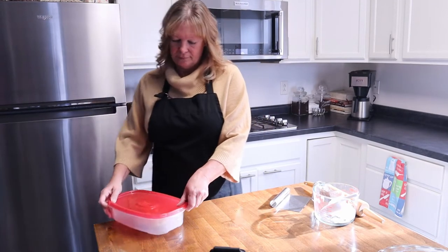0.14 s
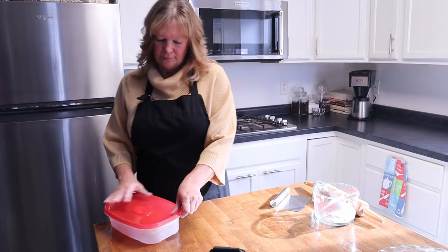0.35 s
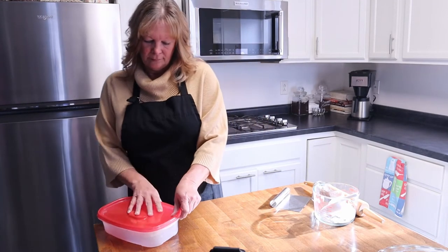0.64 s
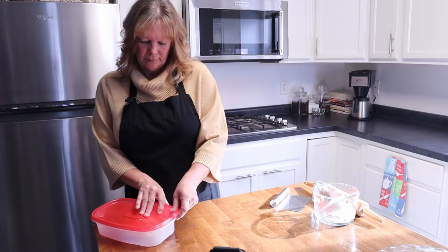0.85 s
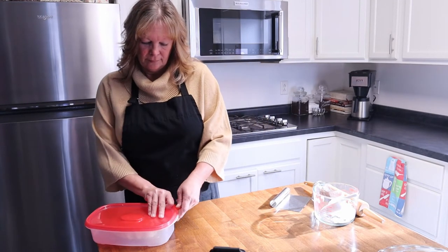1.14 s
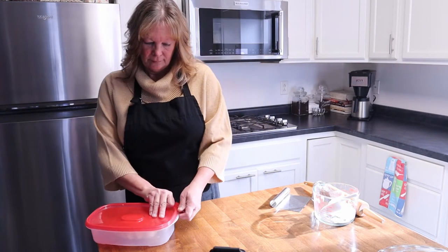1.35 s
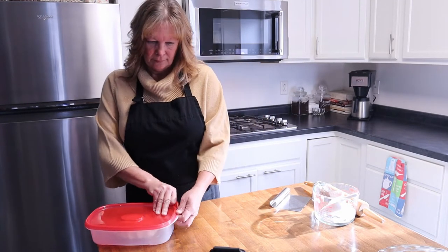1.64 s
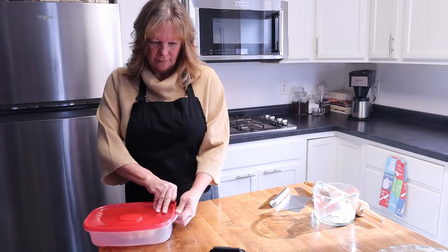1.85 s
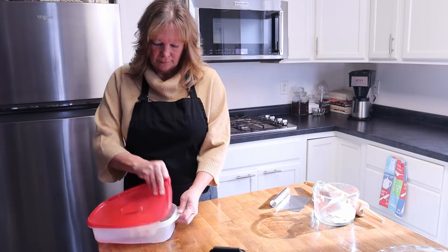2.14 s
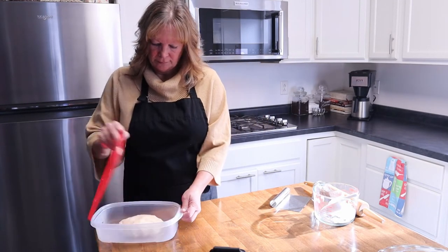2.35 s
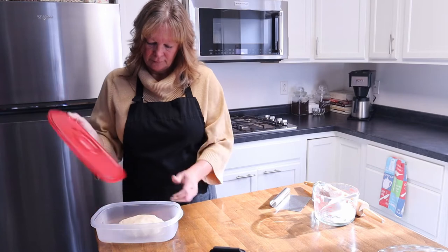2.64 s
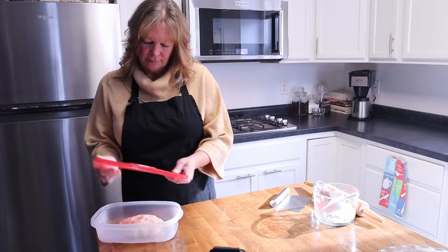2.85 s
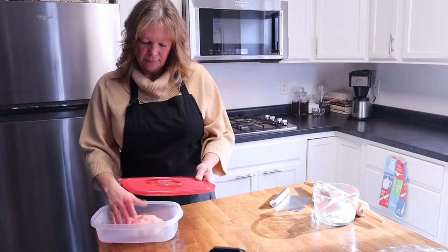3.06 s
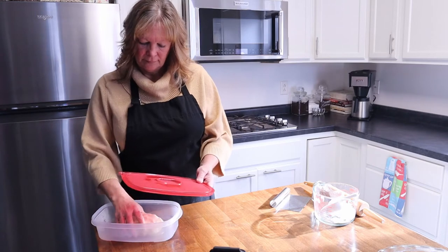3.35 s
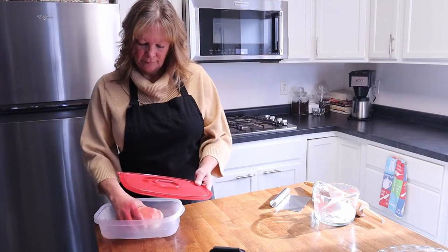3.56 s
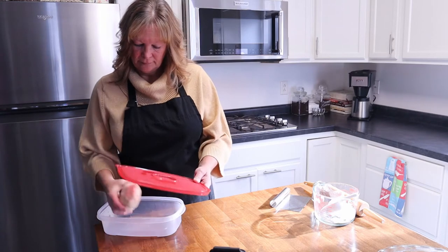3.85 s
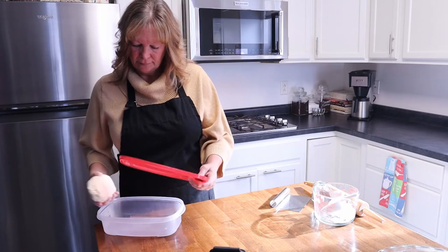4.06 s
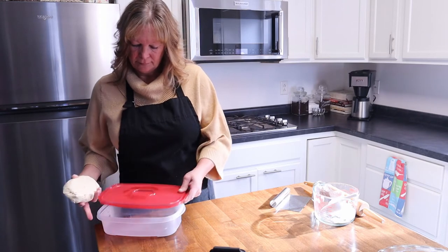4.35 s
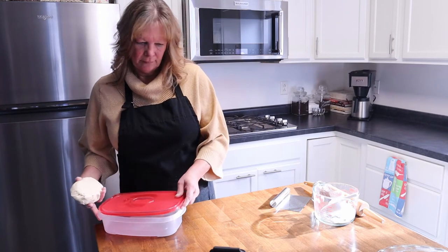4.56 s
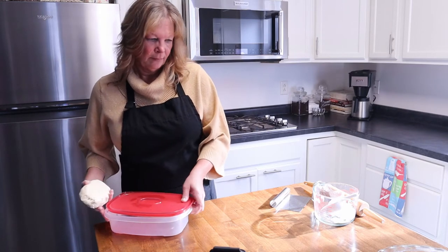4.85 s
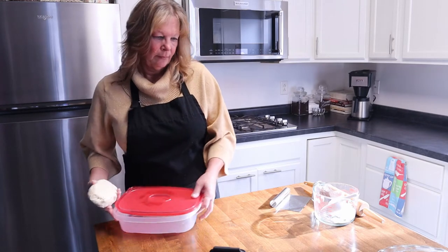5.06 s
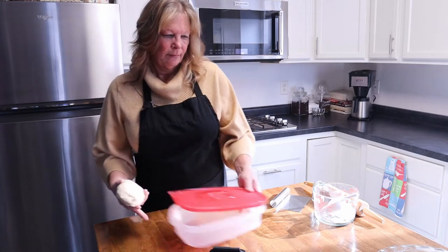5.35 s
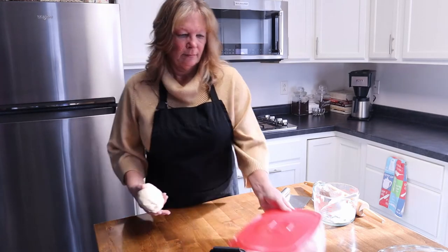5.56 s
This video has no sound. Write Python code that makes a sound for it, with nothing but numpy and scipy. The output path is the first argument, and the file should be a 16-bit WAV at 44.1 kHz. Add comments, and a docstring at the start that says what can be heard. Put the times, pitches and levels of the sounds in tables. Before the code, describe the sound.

A plastic tub thumps and scrapes onto a wooden counter, its lid clicks and pops off, then snaps sharply back on over a fridge hum.

```python
"""Plastic tub and snap lid on a kitchen counter

A plastic tub is set on a wooden counter, its snap lid is pressed, peeled off and dropped back on.
Knocks ring decaying modes of tub and lid; the rim cracks in filtered clicks; skin and sliding tub
are dense stick-slip clicks; the counter top adds low plate modes and rumble. A small hard kitchen
echoes the near sounds by noise convolution, over the shaped noise and tones of a refrigerator."""
import sys
import numpy as np
from scipy import signal
from scipy.fft import rfft, irfft, next_fast_len
from scipy.io import wavfile

SR = 44100
rng = np.random.default_rng(int(sys.argv[2]) if len(sys.argv) > 2 else 0)


def waveform_to_disk(signal):
    """Save audio, clipped to [-1, 1], as 16-bit WAV at the path in sys.argv[1]."""
    frames = np.transpose(np.atleast_2d(signal))
    scaled = np.clip(frames, -1, 1) * 32767
    samples = np.round(scaled).astype(np.int16)
    wavfile.write(sys.argv[1], SR, samples)


N = 251105

# modes of tub and lid: mode_hz, relative_db
TUB_MODES = [(75, -40.5), (140, -7), (190, -2.5), (254, -0.5), (320, -9), (345, -4), (415, -3.5), (460, -1),
             (515, -0.5), (590, 7), (665, 0), (720, -1.5), (825, 2.5), (905, -8.5), (993, -2.5), (1115, -5),
             (1230, 0), (1333, 5.5), (1440, 2.5), (1595, 9.5), (1775, 4), (1987, 5.5), (2445, 2), (2840, 7)]


def from_db(db):
    """Gain of a level in dB."""
    return 10 ** (np.asarray(db) / 20)


def rms_one(x):
    """Scales to rms 1."""
    return x / np.sqrt(np.mean(x ** 2) + 1e-20)


def at_hz(points, hz):
    """Interpolates a (Hz, value) table along log frequency."""
    table_hz, values = np.transpose(points)
    return np.interp(np.log(hz + 1), np.log(table_hz), values)


def coloured(x, spectrum):
    """Filters a signal by a spectrum in dB, at zero phase."""
    size = next_fast_len(len(x))
    gain = from_db(at_hz(spectrum, np.fft.rfftfreq(size, 1 / SR)))
    return irfft(rfft(x, size) * gain, size)[:len(x)]


def drift(rate_hz):
    """Slow random wander of rms 1: noise through a double one-pole lowpass."""
    r = np.exp(-2 * np.pi * rate_hz / SR)
    wander = signal.lfilter([1], [1, -2 * r, r * r], rng.standard_normal(N + SR))
    return rms_one(wander[SR:])     # drops the settling second


def add(out, start_s, sound):
    """Mixes a short sound in at a time."""
    at = round(start_s * SR)
    out[at:at + len(sound)] += sound[:max(N - at, 0)]


def near_to(hz, centre_hz, octaves):
    """Bell-shaped weight of a mode by its distance in pitch."""
    return np.exp(-.5 * (np.log2(hz / centre_hz) / octaves) ** 2)


def swells(peak_s, level_db, swell_s, fade_s):
    """Power of each gesture, every 32nd sample: climbs 20 dB in its swell, sinks 20 dB in its fade."""
    late_s = np.arange(0, N, 32) / SR - np.c_[peak_s]
    before = -late_s / np.c_[np.maximum(swell_s, .001)]
    after = late_s / np.c_[fade_s]
    return from_db(np.c_[level_db] - 20 * np.maximum(before, after)) ** 2


def smooth(power):
    """Gain at every sample from power at every 32nd."""
    return np.interp(np.arange(N) / 32, np.arange(len(power)), np.sqrt(power))


def friction(spectrum, slips_per_s, spread_db, patchy_db, patch_hz):
    """Stick and slip: dense clicks of uneven size and random sign whose level wanders in patches."""
    sizes = from_db(spread_db * np.minimum(rng.exponential(1, N), 5)) * rng.choice([-1, 1], N)
    happens = rng.random(N) < slips_per_s / SR
    slips = sizes * happens * from_db(patchy_db * drift(patch_hz))
    return rms_one(coloured(slips, spectrum))


def refrigerator(waver_db):
    """Fan and room noise of a fixed spectrum, with compressor tones that waver in level and phase."""
    # fan and room noise: freq_hz, relative_db_per_hz
    drone_spectrum = [(15, -43), (25, -5), (48, -30), (116, -7.5), (210, -5.5), (369, -1), (552, 1),
                      (667, 3), (921, -10), (1210, -16), (1310, -45), (1620, -58), (2360, -19), (8370, -23),
                      (15600, -25)]
    # compressor tones: pitch_hz, median_rms_db
    hum_tones = [(118.4, -58), (236.9, -62), (323.0, -55.5), (366.1, -57.5), (436.0, -55.5), (1184, -65.5)]
    t = np.arange(N) / SR
    tones = np.zeros(N)
    for hz, db in hum_tones:
        gain = np.sqrt(2) * from_db(db + waver_db * drift(1.3))
        tones += gain * np.sin(2 * np.pi * hz * t + 0.68 * drift(2.4))
    drone_db = -50.5
    return from_db(drone_db) * rms_one(coloured(rng.standard_normal(N), drone_spectrum)) + tones


def kitchen(x):
    """Room echo: octave bands of noise, each dying at its own rate after the first wall."""
    # reverberation: freq_hz, t60_s
    room_t60 = [(100, 0.29), (400, 0.24), (1500, 0.31), (5000, 0.28), (12000, 0.34)]
    echo_db, first_wall_s = -7, 0.0042
    t = np.arange(SR // 2) / SR
    # early echoes stand apart
    uneven_db = 3.2 * rng.standard_normal(len(t)) * np.exp(-t / 0.015)
    white = rng.standard_normal(len(t)) * from_db(uneven_db)
    tail = np.zeros(len(t))
    for low_hz in 40 * 2. ** np.arange(9):
        edges_hz = [low_hz, min(2 * low_hz, .45 * SR)]
        band = signal.sosfilt(signal.butter(2, edges_hz, "band", fs=SR, output="sos"), white)
        tail += band * from_db(-60 * t / at_hz(room_t60, np.sqrt(2) * low_hz))
    tail *= np.clip(t / first_wall_s - 1, 0, 1)     # silent to the first wall, full at twice that
    return from_db(echo_db) * signal.fftconvolve(x, tail / np.linalg.norm(tail))[:N]


def rumble():
    """The counter top shakes when hit or leaned on: lumpy low noise under each shake."""
    # shakes of the counter: peak_s, level_db, swell_s
    shakes = [(0.0, -42, 0.061), (0.16, -18.5, 0.055), (0.33, -35, .2), (0.5, -44, .2), (0.7, -44, 0.16),
              (0.86, -39, .15), (1.09, -36, 0.099), (1.8, -53, .15), (1.98, -54, .2), (2.28, -52, 0.13),
              (2.84, -51.5, 0.17), (3.2, -44, 0.18), (3.6, -52, .1), (4.57, -48, 0.052), (4.79, -53, 0.087),
              (4.99, -54, .1), (5.69, -44, .03)]
    # counter noise: freq_hz, relative_db_per_hz
    rumble_spectrum = [(12, -32), (20, -2), (32, -1), (70, 1), (97, -1), (110, -2), (140, -44), (240, -120)]
    fade_per_swell, still_db = 1.4, -60
    peak_s, level_db, swell_s = np.transpose(shakes)
    power = swells(peak_s, level_db, swell_s, fade_per_swell * swell_s).sum(axis=0) + from_db(still_db) ** 2
    noise = friction(rumble_spectrum, 1300.0, spread_db=6.5, patchy_db=4.5, patch_hz=31.0)
    return smooth(power) * noise


def thuds(contact_s):
    """The counter top answers a blow with a few low plate modes that swell over the contact time."""
    # blows that reach the wood: start_s, relative_db, note_hz, t60_s
    counter_blows = [(0.132, -8, 237, 0.18), (0.259, -19, 232, 0.18), (1.048, -32, 269, 0.2),
                     (1.71, -35, 193, 0.17), (1.954, -16.5, 252.3, 0.26), (2.258, -30, 168, 0.16),
                     (3.18, -22.5, 232.5, 0.15), (3.584, -8.5, 254.7, 0.13), (3.608, -14.5, 115, 0.16),
                     (4.574, -17.5, 232, 0.23), (4.767, -21.5, 283.6, 0.27), (5.679, -12.5, 160, 0.2)]
    # plate modes: multiple_of_note, relative_db
    plate_modes = [(.5, -13), (0.999, 2.5), (1.45, -7), (2.1, -4.5)]
    ratio, mode_db = np.transpose(plate_modes)
    out, t = np.zeros(N), np.arange(SR // 2) / SR
    swell = 1 - np.exp(-t / contact_s)
    for start_s, level_db, note_hz, t60_s in counter_blows:
        rings = from_db(mode_db) @ np.sin(2 * np.pi * np.outer(note_hz * ratio, t))
        add(out, start_s, from_db(level_db - 1.5 - 60 * t / t60_s) * swell * rings)
    return out


def sliding(t60_s, octaves, mode_share):
    """Slips on the wood scrape broadly and ring the tub modes near the power-weighted push centre."""
    # pushes that slide and flex the tub: peak_s, scrape_level_db, swell_s, fade_s, mode_centre_hz
    pushes = [(0.0, -25.5, .1, .1, 600), (0.1, -31, 0.026, 0.25, 890), (0.146, -12, .01, 0.36, 377),
              (0.3, -27, 0.24, 0.16, 377), (0.51, -35.5, 0.36, 0.48, 318), (0.656, -31.5, 0.16, 0.12, 590),
              (0.8, -25, 0.1, 0.1, 500), (1.008, -39.5, 0.09, 0.38, 277), (1.088, -33.5, 0.27, 0.11, 440),
              (1.204, -38, 0.34, 0.27, 595), (1.48, -37, .3, 0.62, 593), (1.69, -40, 0.44, 0.37, 345),
              (1.94, -39, 0.18, 0.057, 463), (2.182, -27, .13, 0.23, 485), (2.468, -49, .1, 0.092, 410),
              (3.15, -47.5, 0.45, 0.11, 440), (3.33, -39, 0.18, 0.23, 604), (3.565, -40, 0.074, 0.27, 820),
              (3.677, -47, .3, .1, 725), (3.77, -43, .1, 0.13, 760), (4.683, -33, 0.18, 0.076, 403),
              (4.78, -33.5, 0.18, 0.38, 445), (4.869, -38.5, .3, 0.24, 378), (5.04, -37, 0.49, 0.33, 480),
              (5.2, -32, 0.25, 0.1, 557), (5.53, -42.5, 0.086, .1, 440)]
    # scrape: freq_hz, relative_db_per_hz
    scrape_spectrum = [(59, -33), (100, -46), (134, 6), (216, 4), (295, 4), (1150, -7.5), (1560, -9.5),
                       (2030, -14), (4000, -30), (5200, -99), (8800, -120)]
    murmur_db, murmur_hz = -50.5, 383       # a faint steady murmur fills the gaps between pushes
    *shape, push_hz = np.transpose(pushes)
    push_power, murmur_power = swells(*shape), from_db(murmur_db) ** 2
    power = push_power.sum(axis=0) + murmur_power
    centre_hz = np.exp((np.log(push_hz) @ push_power + np.log(murmur_hz) * murmur_power) / power)
    slips = friction(scrape_spectrum, 4000., spread_db=3.0, patchy_db=4.0, patch_hz=18.4)
    rings = np.zeros(N)
    r = from_db(-60 / (t60_s * SR))
    for k, (hz, _) in enumerate(TUB_MODES):
        w = 2 * np.pi * hz / SR
        mode = rms_one(signal.lfilter([1], [1, -2 * r * np.cos(w), r * r], slips))
        rings += (-1) ** k * smooth(near_to(hz, centre_hz, octaves) ** 2) * mode    # signs alternate
    return smooth(power) * (slips + mode_share * rings)


def rubbing():
    """Fine slips of skin on plastic and of the rattling lid, each tilted about 4500 Hz by its lean."""
    # rub strokes: peak_s, level_db, swell_s, fade_s, treble_lean_db (treble up, bass down by this)
    rubs = [(0.05, -44, 0.24, 0.17, 3.5), (0.099, -34.5, 0.027, 0.25, -13), (0.4, -33.5, 0.25, 0.13, 5.5),
            (0.55, -45.5, 0.4, .3, 5), (0.7, -43, 0.35, 0.38, 2.5), (0.831, -36, 0.12, 0.045, -4.5),
            (0.955, -41.5, 0.12, 0.34, 8), (1.1, -36.5, 0.38, 0.21, 1), (1.211, -27, 0.055, 0.087, 1),
            (1.44, -53, 0.17, 0.16, 2), (1.517, -37.5, 0.19, 0.13, -2), (1.763, -37, 0.12, 0.082, -1.2),
            (2.01, -34, 0.1, 0.051, -4), (2.19, -33, 0.18, 0.092, 2.5), (2.27, -36, 0.097, 0.15, -4.5),
            (2.544, -43, 0.099, 0.073, -1.5), (2.898, -39, 0.066, 0.16, 5),
            (2.95, -42.5, 0.084, 0.068, 2.5), (3.36, -42.5, .07, 0.48, 1.5), (3.5, -54.5, 0.36, .1, -3),
            (4.022, -58, 0.11, 0.14, 7), (4.162, -56.5, 0.082, .4, 8), (4.917, -40, 0.046, 0.077, 0),
            (5.04, -44.5, 0.37, .2, 2), (5.15, -40.5, 0.093, 0.27, -0.5), (5.215, -53, 0.11, 0.066, 3.5),
            (5.368, -49, 0.047, 0.056, -1), (5.64, -47, 0.28, 0.16, -0.5)]
    # loose lid rattles after a blow: start_s, level_db, treble_lean_db
    lid_rattles = [(0.142, -24, 1.5), (0.26, -26.5, 2), (0.599, -36.5, 2.5), (1.424, -42, 2),
                   (1.958, -37.5, -8.5), (2.116, -35, 3.5), (2.312, -37.5, 1), (2.844, -52, 8.5),
                   (3.174, -36.5, -11), (3.551, -44.5, -7), (3.584, -24.5, -13), (4.584, -19.5, -4.5),
                   (4.779, -29, -3.5), (4.984, -43, -5), (5.171, -35.5, 3)]
    # fine slips: freq_hz, relative_db_per_hz
    skin_spectrum = [(880, 4.5), (1500, 1), (2090, -2), (4940, -4), (6430, -5), (8210, -7), (10500, -8.5),
                     (13300, -11), (15500, -19)]
    rattle_fade_s, slap_db, slap_fade_s, resting_hands_db = 0.15, 8, 0.024, -66
    *shape, rub_lean_db = np.transpose(rubs)
    start_s, level_db, rattle_lean_db = np.transpose(lid_rattles)
    instant = 0 * start_s
    rattle_power = swells(start_s, level_db, instant, rattle_fade_s + instant)
    # each opens with a short louder slap
    rattle_power += swells(start_s, level_db + slap_db, instant, slap_fade_s + instant)
    power = np.r_[swells(*shape), rattle_power]
    lean = from_db(np.r_[rub_lean_db, rattle_lean_db]) ** 2
    rest = from_db(resting_hands_db) ** 2
    slips = friction(skin_spectrum, 5000., spread_db=3.0, patchy_db=2.0, patch_hz=29.6)
    dull = signal.sosfilt(signal.butter(2, 4500, fs=SR, output="sos"), slips)
    bright = signal.sosfilt(signal.butter(2, 4500, "high", fs=SR, output="sos"), slips)
    # the minus keeps the two halves in phase at the crossover
    return smooth((1 / lean) @ power + rest) * dull - smooth(lean @ power + rest) * bright


def rim(x, share_db):
    """The stiff rim: the dry sound plus the two-pole resonances that it stirs."""
    # rim resonances: freq_hz, width_hz, relative_db
    rim_modes = [(3575, 97, -4), (4980, 17, -13), (5540, 46, -14), (5960, 87, 0), (6890, 57, -33),
                 (8820, 310, 3)]
    out = x
    for hz, width_hz, level_db in rim_modes:
        r = np.exp(-np.pi * width_hz / SR)
        feed = [(1 - r * r) / 2, 0, (r * r - 1) / 2]
        back = [1, -2 * r * np.cos(2 * np.pi * hz / SR), r * r]
        out = out + from_db(level_db + share_db) * signal.lfilter(feed, back, x + 1e-18)
    return out


def cracks(width, rattle, length_s):
    """Rim and fingernails: a click with a brief dying rattle of noise, through one broad resonance."""
    # cracks: start_s, peak_db (before the rim), centre_hz
    snaps = [(0.0246, -28, 2810), (0.0855, -19, 2120), (0.1388, -5.5, 4750), (0.144, -16, 4010),
             (0.2612, 0, 8100), (0.5103, -25, 2910), (0.6013, -12.5, 6010), (0.6427, -17.5, 3100),
             (0.806, -23, 3030), (0.8262, -12, 7140), (0.85, -12, 7850), (1.0457, -17, 4220),
             (1.1111, -19, 8740), (1.2146, -7.5, 6870), (1.4261, -27, 4270), (1.5071, -20, 4190),
             (1.518, -21, 3970), (1.5255, -23, 5110), (1.716, -21, 3840), (1.7582, -17.5, 7850),
             (1.8899, -32, 2490), (1.9615, -11, 3900), (2.004, -23, 5390), (2.117, -13, 10000),
             (2.211, -22, 4450), (2.27, -21, 4210), (2.318, -16, 8000), (2.538, -33, 4610),
             (2.8448, -40, 6040), (2.8996, -32, 4570), (3.1686, -24, 3530), (3.1749, -12, 5080),
             (3.192, -18, 3620), (3.2074, -18, 3010), (3.327, -29, 3440), (3.5006, -24, 8040),
             (3.554, -31, 4470), (3.579, -1, 3300), (3.5836, 1, 3300), (3.592, -5.5, 3600),
             (3.602, -18, 3960), (3.611, -13, 4370), (3.7177, -20, 5200), (4.578, -1.5, 2800),
             (4.5828, 5.5, 3560), (4.5876, -7.5, 4580), (4.5984, -7, 3670), (4.7579, -20, 3740),
             (4.7787, -5, 5410), (4.895, -26.5, 2500), (4.9142, -27, 5730), (4.986, -28, 4240),
             (5.0037, -20.5, 5880), (5.145, -23, 4890), (5.173, -18, 4000), (5.179, -17, 3000),
             (5.215, -31, 4900), (5.6824, -10, 5000)]
    out, t = np.zeros(N), np.arange(SR // 40) / SR
    bursts = rattle * rng.standard_normal((len(snaps), len(t))) * np.exp(-t / length_s)
    bursts[:, 0] = 1
    for (start_s, peak_db, centre_hz), burst in zip(snaps, bursts):
        edges_hz = [centre_hz / width, centre_hz * width]
        sound = signal.lfilter(*signal.butter(1, edges_hz, "band", fs=SR), burst)
        add(out, start_s, from_db(peak_db) * sound / np.max(np.abs(sound)))
    return out


def knocks(scatter_db, contact_s):
    """Each blow rings the modes at its note, others weakly, with random strength, sign and detuning."""
    # blows on tub and lid: start_s, level_db, note_hz, other_modes_db, t60_s at the note
    blows = [(0.084, -10.5, 1048, -18, 0.1), (0.095, -4.5, 860, -15.5, 0.048), (0.139, -5.5, 595, -9, 0.11),
             (0.161, -1, 310, 2, 0.048), (0.195, -10, 293, -1, 0.11), (0.223, -8, 267, -4, 0.058),
             (0.259, -6, 233, -3, 0.057), (0.34, -21, 683, -5, 0.2), (0.506, -21, 205, -18, 0.25),
             (0.599, -17, 344, -6, 0.074), (0.642, -18.5, 660, -6, 0.15), (0.804, -18.5, 590, 0, 0.08),
             (0.978, -15, 209.6, -22.5, 0.33), (0.994, -14.5, 242, -6, 0.071),
             (1.024, -16.5, 242, -2, 0.12), (1.049, -16, 453, 11, 0.081), (1.427, -31.5, 1160, -10, 0.091),
             (1.507, -21, 580, -13, 0.043), (1.518, -22.5, 520, -3, 0.065), (1.718, -10.5, 212, 20, 0.097),
             (1.758, -21.5, 245, 6, 0.081), (1.889, -24.5, 440, -6, 0.082), (1.959, -3.5, 216, -9, 0.046),
             (1.973, -7.5, 150.6, -7, 0.066), (2.004, -17.5, 260, 1, 0.12), (2.126, -22, 152, -9, 0.18),
             (2.266, -23, 158, 5, 0.044), (2.539, -24.5, 824, -33, 0.072), (2.757, -30.5, 405, 12, 0.12),
             (2.845, -30.5, 320, 23, 0.13), (3.172, -17.5, 586, -18, 0.11), (3.19, -12, 406, -20, 0.042),
             (3.208, -26, 420, 3, 0.11), (3.329, -31, 696, -2, 0.066), (3.434, -30, 990, -20, 0.028),
             (3.549, -22.5, 790, -13, 0.13), (3.578, -2.5, 696, -8, 0.054), (3.584, -1.5, 840, -27, 0.081),
             (3.605, -10, 545, 8, 0.23), (3.69, -12.5, 953, -20, 0.03), (3.717, -18, 633, 9, 0.15),
             (4.577, -5, 576, 9, 0.083), (4.583, -13, 410, -13, 0.29), (4.684, -14, 417, -13, 0.16),
             (4.698, -11.5, 350, -32, 0.1), (4.72, -15, 352, -16, 0.2), (4.756, -18.5, 594, -22, 0.13),
             (4.778, -9, 458, -8, 0.19), (4.818, -17, 323, -13, 0.37), (4.895, -19.5, 447, -11, 0.15),
             (4.986, -19, 426, -9, 0.061), (5.004, -16, 439, -11, 0.071), (5.024, -26, 570, -12, 0.18),
             (5.176, -15.5, 690, -30, 0.078), (5.196, -17.5, 519, -32, 0.083), (5.525, -35, 446, 6, 0.14),
             (5.682, -7.5, 376.3, -28, 0.21)]
    hz, mode_db = np.transpose(TUB_MODES)
    out, t = np.zeros(N), np.arange(SR // 4) / SR
    swell = 1 - np.exp(-t / contact_s)      # soft plastic takes a moment to push
    luck = rng.standard_normal((len(blows), 3, len(TUB_MODES)))
    for (start_s, level_db, note_hz, around_db, t60_s), (strength, sign, detune) in zip(blows, luck):
        around = from_db(around_db + mode_db + scatter_db * strength) * near_to(hz, note_hz, octaves=1)
        gains = (near_to(hz, note_hz, octaves=0.065) + around) * np.sign(sign)
        mode_t60_s = t60_s * (note_hz / hz) ** 0.38     # higher modes die sooner
        tones = np.sin(2 * np.pi * np.outer(hz * (1 + 0.0083 * detune), t))
        rings = tones * from_db(-60 * t / mode_t60_s[:, None])
        add(out, start_s, from_db(level_db) * swell * (gains @ rings) / np.linalg.norm(gains))
    return out


def scene():
    """Hands, tub and counter in the kitchen, over the refrigerator."""
    # microphone response: freq_hz, gain_db
    microphone = [(100, -8), (1000, -1), (4000, -1.5), (8500, 0), (10800, -6), (13500, -2.5), (15500, -7)]
    near = knocks(scatter_db=4.5, contact_s=0.00031) + thuds(contact_s=0.0018)
    near += sliding(t60_s=0.11, octaves=0.29, mode_share=0.44)
    near += rim(cracks(width=1.72, rattle=0.23, length_s=0.0017) + rubbing(), share_db=-8.0)
    radiates_hz = 86    # small bodies push little air below this
    near = signal.sosfilt(signal.butter(4, radiates_hz, "high", fs=SR, output="sos"), near)
    picked_up = coloured(near + kitchen(near), microphone)
    return (picked_up + rumble() + refrigerator(waver_db=1.8))[None]


def record(dry):
    """Clips peaks beyond 0.98, then cuts the top steeply."""
    cutoff_hz = 15700
    lowpass = signal.ellip(10, .5, 70, cutoff_hz, fs=SR, output="sos")
    return signal.sosfilt(lowpass, np.clip(dry, -.98, .98))


dry = scene()
out = record(dry)
waveform_to_disk(out)
```